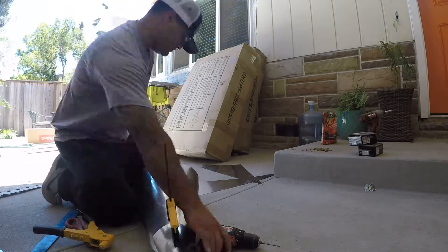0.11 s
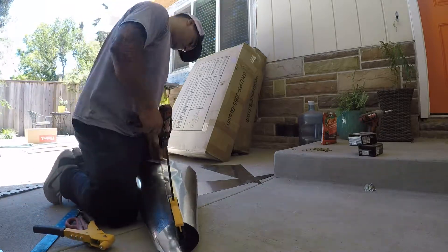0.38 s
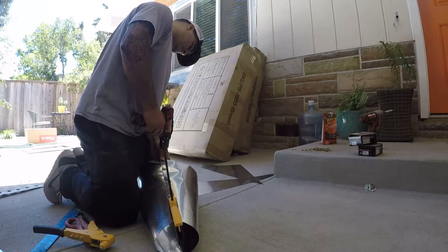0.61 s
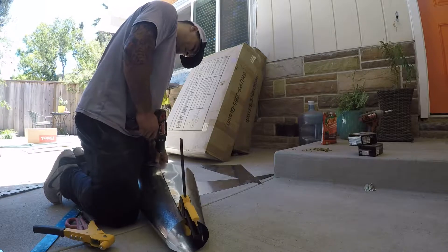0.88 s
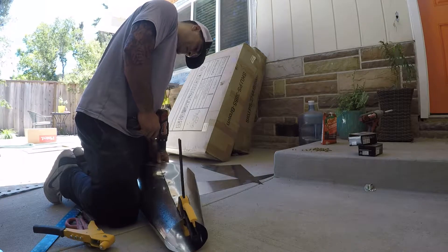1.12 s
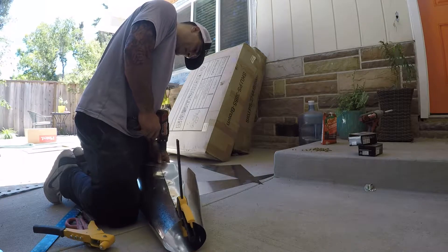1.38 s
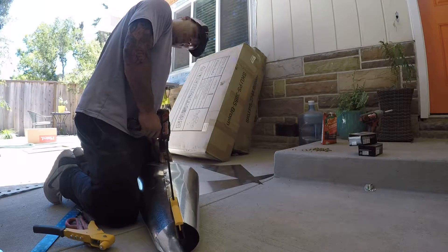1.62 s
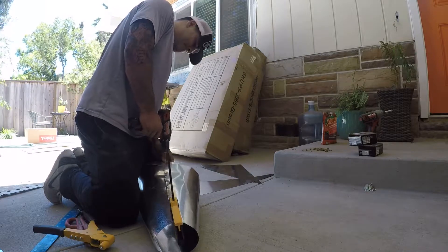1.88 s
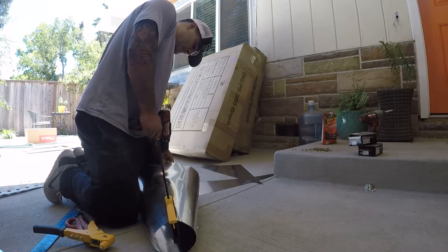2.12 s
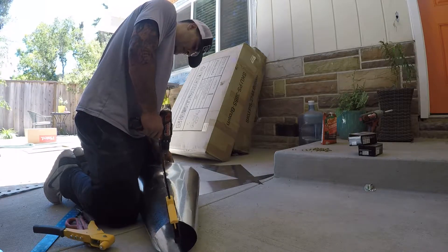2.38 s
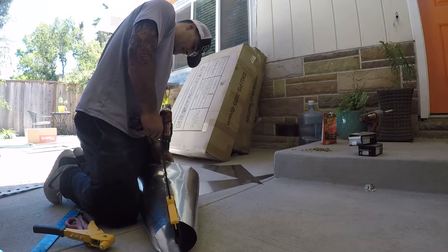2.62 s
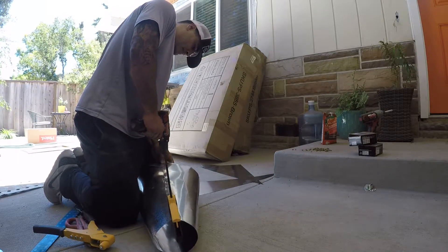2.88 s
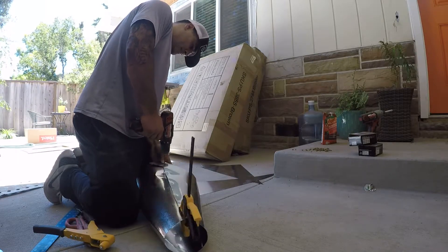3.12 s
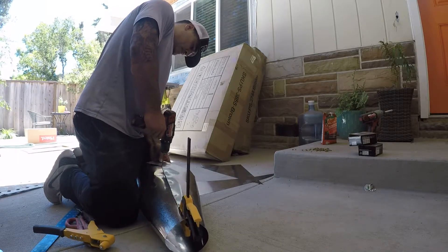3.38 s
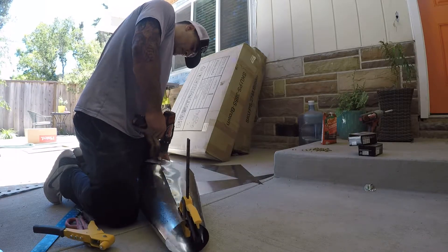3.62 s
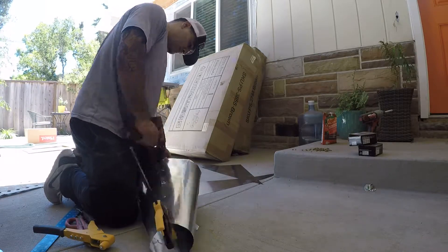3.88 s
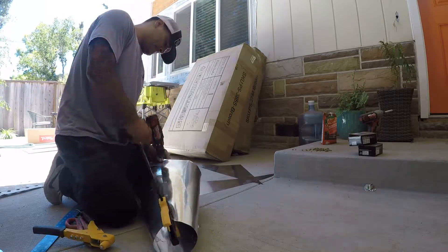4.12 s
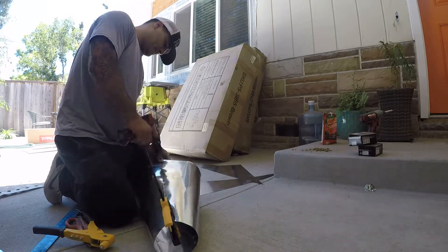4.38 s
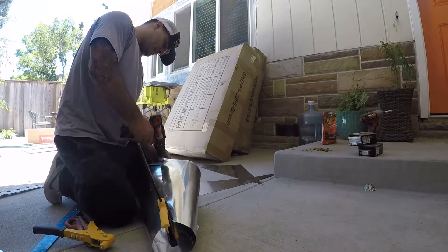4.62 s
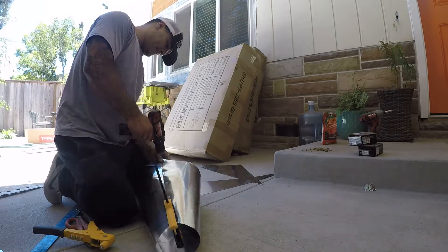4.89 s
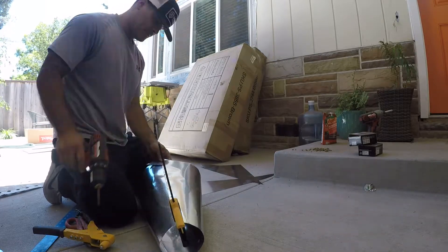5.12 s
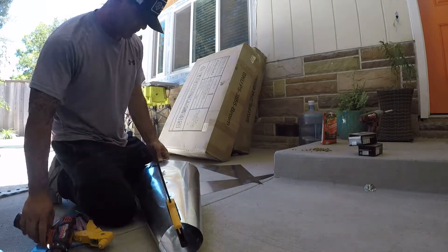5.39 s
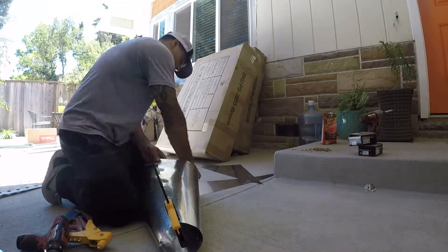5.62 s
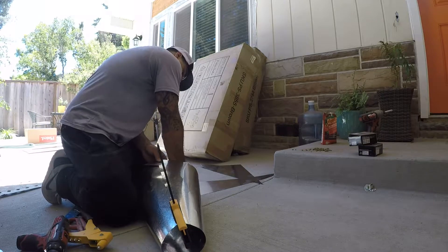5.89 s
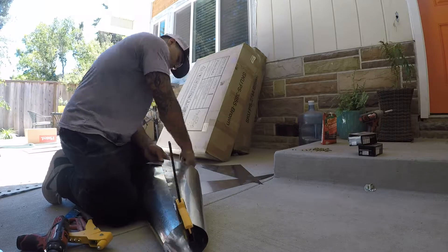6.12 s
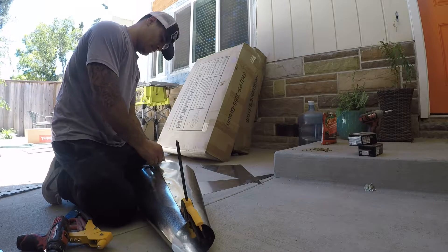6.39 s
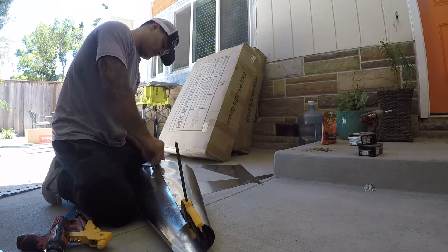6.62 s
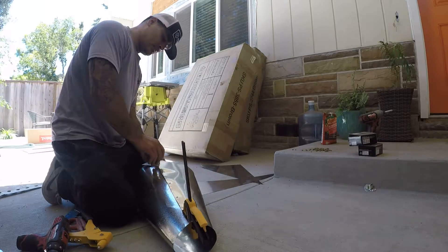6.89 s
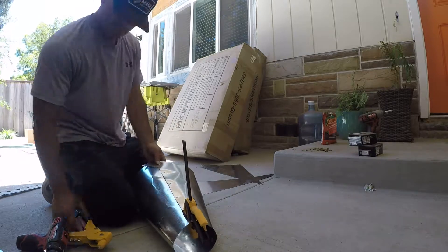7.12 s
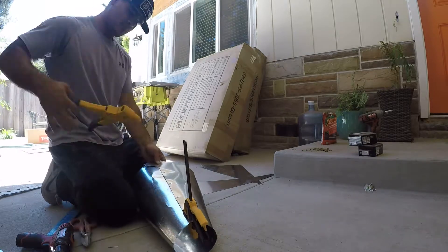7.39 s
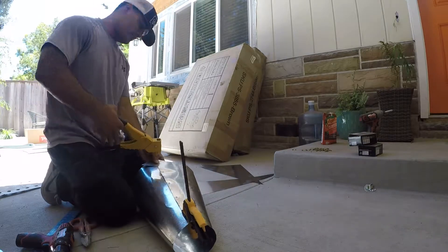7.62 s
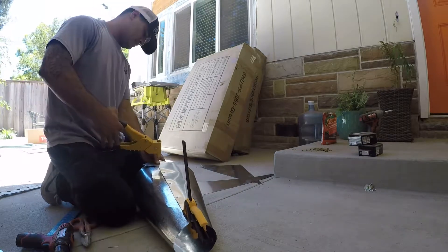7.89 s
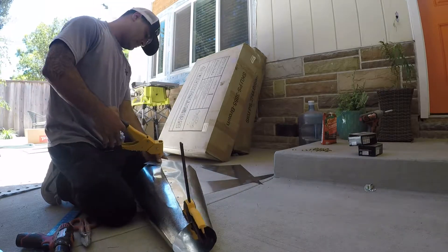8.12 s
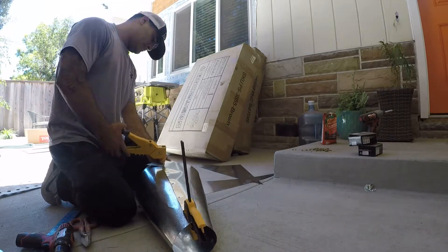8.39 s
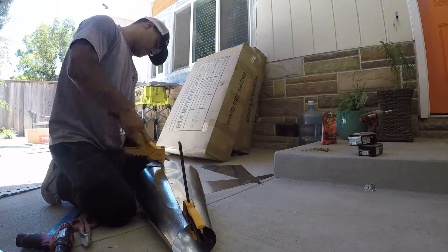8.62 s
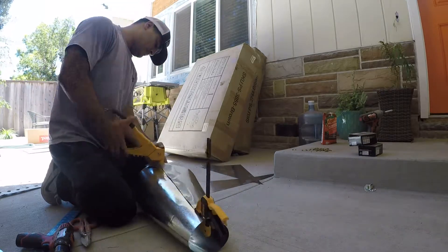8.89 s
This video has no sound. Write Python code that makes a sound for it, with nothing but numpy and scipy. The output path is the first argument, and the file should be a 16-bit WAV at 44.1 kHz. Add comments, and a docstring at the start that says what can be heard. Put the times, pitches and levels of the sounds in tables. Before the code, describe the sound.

Harsh drill whine and metallic scraping in a thin steel duct for four seconds, followed by sharp tool knocks, scrapes and a faint falling squeal.

```python
"""A cordless drill whirrs, whines and bites through a thin steel duct on a concrete patio: shaped noise for
motor, cutting edge and ringing steel, gliding sines for the gears, short noise bursts for bites.
Tools and rivets knock and scrape before and after (bursts ringing steel and duct), and a riveter squeals.
Under the outdoor roar and hiss, a wind filter opens and lets a machine's steady low drone (resonant noise)
through. Two close microphone ports hear the sounds with phase differences that vary with frequency."""
import sys
import numpy as np
from scipy import signal
from scipy.fft import rfft, irfft, next_fast_len
from scipy.io import wavfile
from scipy.ndimage import uniform_filter1d, map_coordinates

SR = 44100
rng = np.random.default_rng(int(sys.argv[2]) if len(sys.argv) > 2 else 0)


def persist_wave(psi):
    """Save psi, clipped to +-1, as 16-bit WAV."""
    counts = np.round(np.clip(psi, -1, 1) * 32767).astype(np.int16)
    wavfile.write(sys.argv[1], SR, np.atleast_2d(counts).T)


def invert_db(x):
    """Field ratio 10**(x/20) for x, a level in decibels (scalar or array-like)."""
    u = np.asarray(x, float) / 20
    return 10 ** u


N = 397076  # samples

# The drill at work. Each row: time in seconds, motor whirr in dB, load on the bit in dB.
WHIRR_AND_LOAD = [(1.28, -31.5, -3.5), (1.48, -30, -6), (1.52, -31, 0.5), (1.79, -32, -3.5),
                  (2.0, -29.5, -2), (2.3, -28, -3), (2.6, -30, 1), (2.97, -27.5, -3), (3.08, -28.5, 2.5),
                  (3.25, -28.5, -0.5), (3.31, -29.5, 3.5), (3.63, -26.5, -1), (3.69, -30, -1.5),
                  (3.99, -28, -2.5), (4.08, -28, -2), (4.23, -28.5, -2), (4.45, -28, -0.5),
                  (4.62, -28, -3.5), (4.72, -29, 0.5), (4.94, -30, -2), (5.04, -35, 0.5)]
# Colour of fan and brushes. Each row: frequency in Hz, relative level in dB.
WHIRR_COLOUR = [(2900, -19), (5000, 4.5), (6300, 6), (8000, 4), (10600, 4), (12500, 4.5), (15000, 4),
                (15750, 0), (16100, -76)]
# Resonances of the motor housing. Each row: frequency in Hz, width in Hz, relative level in dB.
HOUSING_MODES = [(6200, 550, -7.5), (9870, 550, -11), (12400, 720, -8), (14000, 540, -16)]
# Colour of the flutes scraping steel. Each row: frequency in Hz, relative level in dB.
CUTTING_COLOUR = [(820, -13.5), (1400, 0.5), (1740, -2.5), (2630, 0), (3430, 0.5), (3820, 4.5), (4500, 0),
                  (6150, -3.5), (6750, -13), (9000, 1), (11700, -9), (19800, -120)]
# Resonances of the tools' steel. Each row: frequency in Hz, width in Hz, relative level in dB.
STEEL_MODES = [(1860, 380, 4), (2050, 40, -28), (2560, 220, 8), (3124, 25, 18), (3780, 480, 12.5),
               (4450, 290, 11.5), (4734, 39, 12), (5500, 62, 12), (6150, 170, 3), (7360, 110, 11.5),
               (7660, 150, 3), (8400, 570, 12), (8610, 130, 3), (8620, 210, 7), (10120, 740, -1.5),
               (11590, 160, -14), (12800, 230, -25), (13500, 260, -14), (13600, 540, 4.5)]
# Resonances of the duct wall. Each row: frequency in Hz, width in Hz, relative level in dB.
DUCT_MODES = [(546, 82, -10.5), (650, 35.5, 3), (831, 74, -5.5), (1026.5, 47, 2.5), (1133, 49, 7.5),
              (1155.7, 45, 6.5), (1301, 24.5, 6.5), (1421, 42, 2), (1590, 91, -4), (2065, 31, -1.5),
              (2300, 220, -5.5), (2710, 35, 0), (3297, 40, -1)]
# Narrow notes the duct sings under the turning bit. Each row: frequency in Hz, width of the resonance in Hz.
SINGING_NOTES = [(1020, 20), (1172, 30), (1531, 28), (2046, 36)]
# One value for each singing note: relative level in dB.
SINGING_LEVELS_DB = [0, -4, -6, -5]
# The bit slips free and the noise drops. Each row: time in seconds, return in seconds, depth in dB.
BIT_SLIPS = [(4.005, 0.014, 3), (4.642, 0.087, 4), (4.808, 0.033, 7), (4.845, 0.069, 5.5), (4.92, .02, 8),
             (4.955, 0.019, 1.5)]
# Gear mesh at speed, sagging under load and falling with the brake. Each row: time in seconds, pitch in Hz.
MESH_PITCH = [(1.2, 1290), (1.5, 1268), (1.9, 1251), (2.04, 1263), (2.35, 1255), (2.45, 1237), (2.65, 1248),
              (2.95, 1236), (3.04, 1272), (3.14, 1283), (3.33, 1279), (3.4, 1247), (3.7, 1245),
              (3.77, 1275), (3.83, 1215), (3.9, 1250), (3.97, 1205), (4.02, 1270), (4.06, 1294),
              (4.09, 1262), (4.13, 1232), (4.17, 1244), (4.22, 1263), (4.31, 1300), (4.35, 1296),
              (4.39, 1262), (4.44, 1230), (4.49, 1266), (4.57, 1278), (4.61, 1232), (4.66, 1250),
              (4.7, 1210), (4.74, 1250), (4.8, 1285), (4.87, 1278), (4.98, 1292), (5.03, 1262),
              (5.07, 1170)]
# The leading gear tone. Each row: multiple of the mesh, relative level in dB, left port's lead in radians.
LEADING_GEAR_TONE = [(3, 4.5, 1.9)]
# Higher gear tones. Each row: multiple of the mesh, relative level in dB, left port's lead in radians.
HIGH_GEAR_TONES = [(5, -6, .8), (6, -8, 1), (7, -7, 1), (7.78, -5, .8), (8, -6, .8), (9, -2, .5),
                   (9.85, -2.5, .4), (10.14, -5, .4), (11, -7, .3), (11.56, -5, .3), (12.02, -4, .3)]
# A short rasp as the trigger is touched, then the bit's bites. Each row: time in seconds, level in dB,
# duct ring in relative dB, brightest pitch in Hz, rise in seconds.
DRILL_RASPS = [(1.163, -23, -20, 9000, 0.0054), (1.9822, -11.5, -4.5, 13500, 0.0049),
               (1.985, -10.5, -11, 1800, 0.0016), (1.987, -13.5, -18, 6500, .003),
               (2.4292, -15, -1, 9120, 0.0062), (2.5594, -17, -3, 12400, .006),
               (2.9844, -12.5, -2.5, 6170, 0.0055), (3.079, -17, -17, 3800, 0.0055),
               (3.3293, -16, -1.5, 12700, 0.0063), (3.647, -9.5, -1.5, 7800, 0.0028),
               (3.657, -11, -4, 5500, 0.0056), (4.014, -13, -16, 5000, 0.01),
               (4.029, -8.5, -20, 8500, 0.0096), (4.1993, -20.5, -1, 2700, 0.0049),
               (4.316, -15.5, -12, 2690, 0.0086), (4.322, -8, -19, 5600, 0.012),
               (4.359, -9, -29, 8400, .006), (4.366, -10, -20, 13500, 0.0055),
               (4.388, -15, -1, 3770, 0.0056), (4.446, -10, -9, 2690, 0.012),
               (4.453, -12.5, -26, 6960, 0.0058), (4.53, -15, -10, 2400, 0.017),
               (4.562, -16, -8, 5000, 0.011), (4.719, -19, 0.5, 2500, 0.0067),
               (4.755, -13, -13, 2700, 0.0095), (4.77, -8, -12, 4430, .008),
               (4.7897, -21.5, 0.5, 2700, 0.005), (4.812, -8.5, -18, 8200, 0.0099),
               (4.883, -8.5, -21, 9700, 0.0043), (4.892, -18, -7, 2670, 0.0093),
               (4.934, -13, -27, 13600, .006), (4.962, -12, -24, 13600, .004),
               (4.971, -8, -19, 14200, .005), (4.997, -19, -9, 8300, 0.008), (5.042, -35, -12, 6600, .006)]
# Chips squeal on the bit. Each row: start in seconds, length in seconds, start and end pitch in Hz, level in dB.
CHIP_SQUEALS = [(3.138, 0.06, 10000, 8400, -26), (3.183, 0.064, 8100, 7770, -26.5),
                (3.757, 0.11, 6200, 5880, -30.5), (3.853, 0.068, 5700, 5370, -27),
                (4.09, 0.036, 5900, 5560, -30), (4.615, 0.067, 6150, 6200, -26)]
# Blunt knocks, each ringing one note: the duct under the drill, later the riveter's body. Each row: time in
# seconds, level in dB, note in Hz, 60 dB decay in seconds.
THUMPS = [(2.989, -28, 620, .05), (3.418, -33, 668, .4), (3.79, -32.5, 635, 0.39),
          (3.96, -31, 647, 0.15), (4.034, -33, 652, 0.14), (4.205, -26.5, 650, 0.11),
          (4.318, -22, 2710, 0.12), (4.39, -28, 660, 0.093), (4.455, -30, 2670, .08),
          (4.46, -36, 650, 0.056), (4.543, -27, 2300, .07), (4.63, -35, 650, 0.23),
          (4.772, -27, 2740, .12), (4.893, -28, 2710, 0.11), (4.76, -34, 649, 0.19),
          (4.79, -24.5, 1264, 0.07), (4.834, -31.5, 636, 0.065), (4.89, -33.5, 611, 0.16),
          (5.005, -34, 645, 0.089), (7.232, -28.5, 670, 0.026), (7.2815, -20.5, 675, 0.036),
          (7.365, -21.5, 696, 0.056)]
# Tools and rivets knock on steel and concrete; near the drill's start, the bit grabs once at 1.14 s and the
# trigger clicks at 1.22 s. # Each row: time in seconds, level in dB, duct ring in relative dB, brightest pitch
# in Hz, 60 dB decay in seconds.
TOOL_TAPS = [(0.0684, -30, 5.5, 2920, 0.19), (0.447, -37, -16, 2190, .073), (0.781, -35, 2, 2530, 0.12),
             (1.139, -33.5, -22, 9000, 0.2), (1.218, -45, -22, 9000, .12), (1.257, -38, 4, 1150, .06),
             (5.293, -47, -25, 9000, .04), (5.358, -43, -25, 10500, 0.26), (5.46, -7.5, -18.5, 9900, 0.045),
             (5.464, -15.5, -19, 9300, 0.13), (5.764, -32, -18, 7700, 0.17),
             (5.8806, -23.5, -33, 7600, 0.11), (5.907, -31, -26, 7660, 0.26),
             (5.973, -23.5, -16, 3780, 0.076), (6.0038, -31, -20, 8600, 0.23), (6.13, -30, -21, 7540, 0.11),
             (6.514, -38, -19, 3780, .09), (6.536, -34, -17, 2700, 0.063), (6.5807, -20.5, -9, 4150, 0.067),
             (6.582, -23, -30, 14000, 0.069), (6.783, -35.5, -8, 3880, 0.25),
             (6.9196, -36.5, -23, 6040, 0.082), (7.083, -25.5, -17, 8400, 0.075),
             (7.102, -24, -21, 10800, .17), (7.148, -26, -15, 10600, .056), (7.226, -17.5, -19, 9700, 0.1),
             (7.2595, -25, -26, 4120, 0.039), (7.281, -21.5, -9, 1860, 0.055),
             (7.3565, -18, -21, 5100, 0.12), (7.3664, -11.5, -13.5, 10000, 0.14),
             (7.955, -33.5, 0, 7300, 0.11), (8.643, -32, -2, 13500, 0.11), (8.658, -19, -16, 13500, 0.098)]
# Tools slide, scrape and are squeezed, swelling before they fade. Each row: time in seconds, level in dB,
# duct ring in relative dB, brightest pitch in Hz, rise in seconds.
TOOL_SCRAPES = [(0.094, -34, -12, 4400, 0.0021), (5.408, -21, -29, 11600, 0.0082),
                (5.688, -29, -18, 7100, 0.015), (5.783, -36, -13, 7900, 0.0087),
                (5.83, -40, -13, 8200, 0.013), (5.862, -35, -20, 8200, .0091),
                (6.143, -29.5, -24, 8400, 0.008), (6.375, -38.5, 5, 6000, 0.0079),
                (7.288, -24.5, -27, 10700, 0.009), (7.325, -29.5, -2, 6000, 0.028),
                (7.372, -18, -14, 10700, 0.024), (7.89, -44, 3, 2500, 0.011), (8.1, -35, -1, 3950, 0.0094),
                (8.118, -35.5, 2, 4000, 0.0051), (8.18, -31.5, -1.5, 6250, 0.031),
                (8.212, -29, 1.5, 3770, 0.022), (8.41, -31, -2, 3720, 0.011),
                (8.636, -15.5, -1, 4400, 0.025), (8.81, -33, -9, 5900, 0.0067),
                (8.824, -26.5, -7, 5100, 0.021)]
# Squeezes of the riveter. Each row: start in seconds, length in seconds, start and settled pitch in Hz,
# level in dB before fading.
RIVETER_SQUEEZES = [(7.955, .41, 5280, 4020, -43), (8.36, .215, 4270, 4050, -46.5),
                    (8.575, .08, 4090, 4030, -51)]
# The squeal's main note, then its overtones. Each row: multiple, relative level in dB, left port's lead in radians.
JOINT_TONES = [(1, 0, 1.5), (1.5, -25, 1), (2, -20, 1), (2.5, -27, 1), (3, -21, .6), (3.45, -21, .5)]
# The far roar rises and falls. Each row: time in seconds, level in dB.
ROAR_LEVEL = [(0.0, -46.5), (0.29, -40), (1.12, -42.5), (5.08, -46.5), (5.25, -43.5), (5.73, -44),
              (6.0, -42), (6.28, -42), (6.84, -43.5), (6.98, -42.5), (7.12, -46.5), (7.3, -43.5),
              (7.55, -47.5), (7.99, -46.5), (8.1, -41.5), (8.26, -45.5), (8.34, -42), (9.0, -45)]
# Colour of the roar. Each row: frequency in Hz, relative level in dB.
ROAR_COLOUR = [(260, -44), (440, -33.5), (550, -5.5), (633, 5), (713, -4.5), (905, 0.5), (1060, -6.5),
               (1180, -6.5), (1430, -10.5), (1730, -53), (1860, -10), (2080, -26), (2600, -18), (3380, -97),
               (5720, -120)]
# Colour of the hiss. Each row: frequency in Hz, relative level in dB.
HISS_COLOUR = [(880, -40), (1500, -0.5), (1870, -4), (2250, -6.5), (2910, -2), (5710, -10), (7840, -15.5),
               (10000, -18), (16000, -22.5)]
# Clothes and hands rustle, and the hiss swells. Each row: start in seconds, length in seconds, peak level in dB.
HISS_RUSTLES = [(-.1, 1.67, -47.5), (5.782, 1.04, -46), (7.137, 0.39, -46), (7.915, 0.39, -48.5),
                (8.4, 0.88, -53)]
# Resonances of the droning machine. Each row: frequency in Hz, width in Hz, relative level in dB.
DRONE_MODES = [(147.5, 9.8, -4.5), (241.5, 29, -11), (289.8, 15.4, 3.5), (341, 7.1, -6), (387.6, 18.3, -1),
               (222, 500, -17.5)]
# The wind filter opens and lets the machine's steady low drone through; the last row stays covered by the third.
# Each row: start in seconds, level of the drone in dB, hold in seconds.
FILTER_OPENINGS = [(0.58, -31, 0.3), (3.357, -33, 0.2), (6.93, -36, 0.027), (7.1, -63.5, 0.22)]
# Phase between the ports. Each row: frequency in Hz, left port's lead in radians.
PORT_LEAD = [(100, -1), (260, -1.9), (420, -1.5), (550, -.2), (2000, -.1), (2900, -1.2), (3450, -3),
             (3700, -3.9), (4300, -3.5), (4900, -7.3), (5700, -6), (7200, -5.4), (8600, -7.2), (10000, -7),
             (11500, -6.25), (16000, -6.3)]
# How alike the ports hear. Each row: frequency in Hz, likeness from 0 to 1.
PORT_LIKENESS = [(100, .5), (250, .88), (600, .72), (1600, .85), (3000, .2), (3800, .6), (4600, .15),
                 (6200, .45), (8000, .25), (9300, .4), (10500, .2), (11500, .5), (14000, .87)]
# Balance of the ports. Each row: frequency in Hz, left over right in dB.
PORT_BALANCE = [(60, 4), (150, -3.5), (380, 1.5), (950, 3.5), (2380, 1), (5980, -0.5), (15000, -1)]

TRIGGER_S, RELEASE_S = 1.214, 5.055  # pulled, let go
SPIN_UP_S, BRAKE_DB_PER_S = 0.021, 900  # time constant of the motor's start; fall under the brake
CONTACT_S, SINKS_S = 1.48, 3.67  # the bit meets the steel; it sinks in and damps the singing notes
BINDS_S, THROUGH_S = 4.01, 4.66  # the bit binds in the hole; it is through
CUT_DB, RING_DB, RING_PER_LOAD = -3, -8.5, 1.8  # cutting and duct re whirr at load 0; ring dB per dB of load
FREE_RING_DB, SINGING_DB = -6.5, -17  # duct change once the bit is through; singing notes re whirr
SLIP_DROP_S = 0.0068
WHINE_DB, WHINE_WANDER_DB, FREE_WHINE_DB = -43.5, 0.8, -4  # base level; slow drift; change once through
WHINE_DB_PER_HZ, MIDDLE_HZ = 0.135, 1263  # louder as the gears speed up
MESH_NOTE_DB, MESH_NOTE_PER_LOAD = -2, 0.5  # the mesh's own low note re the whine; dB per dB of load
DEEP_NOTE_DB, BINDING_DB = 3.5, 2.5  # the low note gains once the bit sinks in; the leading tone while it binds
STARTING_DB, HIGH_FADE_DB_PER_S = 3, 0.5  # faint until at speed; higher tones weaken as the bit sinks in
RASP_T60_S, SCRAPE_T60_S, TAP_RISE_S = 0.096, 0.096, 0.00057
ONSET_S, SETTLE_S = 0.03, 0.135  # the squeal takes hold; time constant of its falling pitch
FADE_DB, FADE_S = 11, 0.13  # the squeal's main note loses strength as the handle slows
RUB_DB = -12  # dry rubbing noise re the squeal
HISS_DB = -50.5
SHUT_DRONE_DB, SHUT_WANDER_DB = -68.5, 2  # the machine's low notes while the filter is shut
OPEN_DB_PER_S, CLOSE_DB_PER_S, CLOSE_TAIL_S = 226, 58, 1  # opening; first fall on closing; its slowing
TOP_HZ, ABOVE_TOP_DB = 15900, -38  # the treble is cut above this


def drill():
    """Motor whirr; the cutting edge scrapes in fine grains and shakes bit and duct."""
    whirr_db, load_db = curves(WHIRR_AND_LOAD)
    slip_db = slips_db()
    whirr_colour = lambda hz: colour(WHIRR_COLOUR)(hz) * (1 + np.abs(modes(HOUSING_MODES)(hz)))
    whirr = invert_db(-2 + 0.67 * wobble(640) + 0.79 * wobble(30.03)) * noise(whirr_colour)

    chatter = invert_db(1.0 * wobble(900) + 1.4 * wobble(40))  # chips tear off unevenly
    scrape = lambda hz: colour(CUTTING_COLOUR)(hz) * (4.6 + np.abs(modes(STEEL_MODES)(hz)))
    cutting = invert_db(CUT_DB + load_db - 1.8 * slip_db) * chatter * noise(scrape)

    ring_db = RING_DB + RING_PER_LOAD * load_db + FREE_RING_DB * (time() > THROUGH_S)
    ring = invert_db(ring_db + 1.6 * wobble(25.09)) * noise(modes(DUCT_MODES))
    singing = (time() > CONTACT_S) * (time() < SINKS_S)
    for (hz, width), db in zip(SINGING_NOTES, SINGING_LEVELS_DB):
        level = invert_db(SINGING_DB + db + load_db / 2 + 1.2 * wobble(5.06))
        narrow = lambda f: modes([(hz, width, 0)])(f) ** 2
        ring = ring + singing * level * noise(narrow)
    return invert_db(whirr_db - slip_db + motor()[1]) * (whirr + cutting + ring)


def motor():
    """Share of full speed, and the loudness in dB that goes with starting and braking."""
    speed = 1 - np.exp(-np.maximum(time() - TRIGGER_S, 0) / SPIN_UP_S)
    brake_db = BRAKE_DB_PER_S * np.maximum(time() - RELEASE_S, 0)
    return speed, 28 * np.log10(speed + 1e-6) - brake_db


def slips_db():
    """How far the drill's noise drops while the bit runs free: a quick fall, a slower return."""
    return sum(np.interp(time() - s, [-SLIP_DROP_S, 0, back], [0, db, 0]) for s, back, db in BIT_SLIPS)


def gears():
    """The gearbox whines at multiples of its tooth mesh; the teeth rattle most while it gathers speed."""
    speed, motor_db = motor()
    full_hz, = curves(MESH_PITCH)
    load_db = curves(WHIRR_AND_LOAD)[1]
    rattle = (0.001 + 0.15 * (1 - speed)) * wobble(200)
    mesh_hz = speed * full_hz * (1 + rattle + 0.002 * wobble(16))
    lead_db = WHINE_DB_PER_HZ * (full_hz - MIDDLE_HZ)

    low_db = MESH_NOTE_DB + DEEP_NOTE_DB * (time() > SINKS_S) + MESH_NOTE_PER_LOAD * load_db
    low = invert_db(low_db) * tones(mesh_hz, [(1, 0, 0.3)], flutter_db=3, rate=20)
    binding = (time() > BINDS_S) * (time() < THROUGH_S)
    leading = invert_db(lead_db + BINDING_DB * binding) * tones(mesh_hz, LEADING_GEAR_TONE, flutter_db=1.3, rate=25)
    high_db = lead_db / 2 - HIGH_FADE_DB_PER_S * (time() - TRIGGER_S)
    high_hz = mesh_hz * (1 + 0.002 * wobble(150))
    high = invert_db(high_db) * tones(high_hz, HIGH_GEAR_TONES, flutter_db=2.5, rate=9)

    whine_db = WHINE_DB + FREE_WHINE_DB * (time() > THROUGH_S) + WHINE_WANDER_DB * wobble(5.5)
    starting_db = STARTING_DB * np.clip((1 - speed) / 0.08, 0, 1)
    return invert_db(whine_db + 0.5 * motor_db - starting_db - 0.6 * slips_db()) * (low + leading + high)


def rasps():
    """A short rasp as the trigger is touched; then the bit grabs the edge of the hole in short rasps."""
    return contacts([(*row, RASP_T60_S) for row in DRILL_RASPS], width=0.47, steel_db=-3.5, crest_db=15.5)


def chips():
    """A few chips squeal against the flutes: gliding sines with a rough pitch."""
    out = np.zeros((2, N))
    for s, length, start_hz, end_hz, db in CHIP_SQUEALS:
        n = round(length * SR)
        roughness_hz = 1200 * uniform_filter1d(rng.standard_normal(n), size=40)
        glide_hz = np.linspace(start_hz, end_hz, n) + roughness_hz
        squeal = np.hanning(n) * np.sin(2 * np.pi * np.cumsum(glide_hz) / SR)
        out[0, round(s * SR):][:n] += invert_db(db) * squeal
    return out


def thumps():
    """A blunt blow rings on one note, with a short hard edge."""
    out = np.zeros((2, N + SR))
    t = np.arange(SR // 4) / SR
    for s, db, hz, t60 in THUMPS:
        note = invert_db(-60 * t / t60) * np.sin(2 * np.pi * hz * t)
        edge = 0.63 * invert_db(-60 * t / 0.014) * np.sin(2 * np.pi * 2.72 * hz * t)
        out[0, round(s * SR):][:len(t)] += invert_db(db) * (note + edge)
    return out[:, :N]


def taps():
    """Hard things knock and scrape, ringing a little like steel."""
    knocks = [(*row, TAP_RISE_S, t60) for *row, t60 in TOOL_TAPS]
    scrapes = [(*row, SCRAPE_T60_S) for row in TOOL_SCRAPES]
    return contacts(knocks + scrapes, width=0.94, steel_db=-4, crest_db=9.5)


def contacts(table, width, steel_db, crest_db):
    """A table of contacts, each a burst at its moment; crest_db makes room for the noise's peaks."""
    out = np.zeros((2, N + SR))
    for s, db, ring_db, bright_hz, rise, t60 in table:
        hit = burst(ring_db, bright_hz, rise, t60, width, steel_db)
        out[:, round(s * SR):][:, :hit.shape[1]] += invert_db(db - crest_db) * hit
    return out[:, :N]


def burst(ring_db, bright_hz, rise, t60, width, steel_db):
    """One contact: noise round its brightest pitch rises and dies; steel and duct ring with it."""
    t = np.arange(SR // 4) / SR
    shape = np.minimum(t / rise, 1) ** 2 * invert_db(-60 * np.maximum(t - rise, 0) / t60)
    crack = shape * noise(modes([(bright_hz, width * bright_hz, 0), (8000, 14000, -9)]), len(t))
    steel = filtered(crack, modes(struck(STEEL_MODES, 2.5)))
    push = shape ** 2 * rng.standard_normal((2, len(t)))  # briefer than the rattle
    ring = filtered(push, modes(struck(DUCT_MODES, 1.8)))
    return crack + invert_db(steel_db) * steel + invert_db(ring_db + 12.0) * ring / np.abs(ring).max()


def struck(table, scatter_db):
    """Each blow lands elsewhere and wakes the modes at new strengths."""
    scatter = scatter_db * rng.standard_normal(len(table))
    return [(hz, width, db + change) for (hz, width, db), change in zip(table, scatter)]


def riveter():
    """Stick-slip in the joint: a thin, broken, falling whistle with uneven overtones."""
    out = 0
    for s, length, start_hz, settled_hz, db in RIVETER_SQUEEZES:
        t = np.maximum(time() - s, 0)
        pitch_hz = settled_hz + (start_hz - settled_hz) * np.exp(-t / SETTLE_S)
        pitch_hz = pitch_hz * (1 + 0.007 * wobble(150))
        gate = np.clip(np.minimum(t / ONSET_S, (length - t) / 0.01), 0, 1)
        level = gate * invert_db(db + 2 * wobble(30))
        faded = 1 - np.exp(-(t / FADE_S) ** 3)
        main = invert_db(-FADE_DB * faded) * tones(pitch_hz, JOINT_TONES[:1], flutter_db=2.5, rate=60)
        # the overtones flutter but do not fade with the main note
        overtones = invert_db(-FADE_DB / 3) * tones(pitch_hz, JOINT_TONES[1:], flutter_db=3.5, rate=20)
        rub = invert_db(RUB_DB - FADE_DB / 2 * faded + 3.3 * wobble(60)) * noise(modes([(10000, 9000, 0)]))
        out = out + level * (main + overtones + rub)
    return out


def outdoors():
    """Coloured noises: a far roar, hiss with rustling, and the machine's resonant drone."""
    roar = invert_db(curves(ROAR_LEVEL)[0] + 1.2 * wobble(12)) * noise(colour(ROAR_COLOUR))
    rustle_power = 0
    for s, length, db in HISS_RUSTLES:
        rustle_power = rustle_power + invert_db(2 * db) * np.sin(np.pi * np.clip((time() - s) / length, 0, 1))
    hiss_level = np.sqrt(invert_db(2 * HISS_DB) + np.abs(rustle_power))
    hiss = hiss_level * invert_db(1.7 * wobble(9.1)) * noise(colour(HISS_COLOUR))
    low_notes = lambda hz: modes(DRONE_MODES)(hz) / (1 + (hz / 460) ** 12)
    return roar + hiss + invert_db(drone_db()) * noise(low_notes)


def drone_db():
    """The drone's level through the wind filter, which opens fast, holds, then closes ever more slowly."""
    level = SHUT_DRONE_DB + SHUT_WANDER_DB * wobble(6.0)
    for s, db, hold in FILTER_OPENINGS:
        opening_s = (db - SHUT_DRONE_DB) / OPEN_DB_PER_S
        after = np.maximum(time() - s - opening_s - hold, 0)
        fall = CLOSE_DB_PER_S * CLOSE_TAIL_S * (1 - np.exp(-after / CLOSE_TAIL_S))
        climb = SHUT_DRONE_DB + OPEN_DB_PER_S * (time() - s)
        level = np.maximum(level, np.minimum(climb, db - fall))
    return level


def time():
    """Seconds, one value per sample."""
    return np.arange(N) / SR


def curves(rows):
    """One value per sample for each column after the time."""
    s, *cols = np.transpose(rows)
    return [np.interp(time(), s, c) for c in cols]


def wobble(rate):
    """A smooth random curve, rate knots a second."""
    knots = rng.standard_normal(int(N * rate / SR) + 4)
    return map_coordinates(knots, [np.arange(N) * rate / SR])


def tones(pitch_hz, partials, flutter_db, rate):
    """Partials of a moving pitch, each fluttering in level on its own and reaching the ports out of step."""
    turn = 2 * np.pi * np.cumsum(pitch_hz) / SR
    out = 0
    for k, db, lead in partials:
        apart = np.array([wobble(rate), wobble(rate)]) / 2  # each port flutters a little on its own
        flutter = invert_db(flutter_db * (wobble(rate) + apart))
        out = out + invert_db(db) * flutter * np.sqrt(2) * np.sin(k * turn + [[lead / 2], [-lead / 2]])
    return out


def noise(response, n=N):
    """Two unrelated noises of one colour, rms 1: for ports(), the direct sound and the scattered sound."""
    return unit(filtered(rng.standard_normal((2, n)), response))


def unit(x):
    """Scaled to rms 1."""
    return x / np.sqrt(np.mean(x ** 2) + 1e-20)


def filtered(x, response):
    """x times a complex response of frequency."""
    n = x.shape[-1]
    m = next_fast_len(n + 4096)
    return irfft(rfft(x, m) * response(np.fft.rfftfreq(m, 1 / SR)), m)[..., :n]


def modes(table):
    """The causal response of a set of resonances, alternating in sign."""
    def response(f):
        total = 0
        for k, (centre, width, db) in enumerate(table):
            damping = 1j * f * width
            total = total + (-1) ** k * invert_db(db) * damping / (centre * centre - f * f + damping)
        return total
    return response


def colour(spectrum):
    """The gain of a spectrum table."""
    return lambda hz: invert_db(along(spectrum, hz))


def along(points, hz):
    """Points of frequency and value, read on a log frequency axis."""
    f, v = np.transpose(points)
    return np.interp(np.log(hz + 1), np.log(f + 1), v)


def ports(pair):
    """Both ports share the direct sound, out of phase by frequency; scattered sound reaches them in opposition."""
    share = lambda hz: np.arccos(np.clip(along(PORT_LIKENESS, hz), 0, 1)) / 2
    side = np.array([[0.5], [-0.5]])
    place = lambda hz: invert_db(side * along(PORT_BALANCE, hz)) * np.exp(1j * side * along(PORT_LEAD, hz))
    direct = filtered(pair[0], lambda hz: np.cos(share(hz)) * place(hz))
    scattered = filtered(pair[1], lambda hz: np.sin(share(hz)) * place(hz) * 2 * side)
    return direct + scattered


def scene():
    """All sources; the wind filter's edge keeps the near sounds thin in the bass."""
    wind_filter = lambda hz: invert_db(-18.5) + 1 / (1 + (520 / (hz + 1)) ** 14)
    near = filtered(drill() + rasps() + chips() + taps() + thumps(), wind_filter)
    return ports(near + outdoors()) + gears() + riveter()


def band_limit(x):
    """A steep low-pass at the top of the band."""
    return signal.sosfilt(signal.butter(12, 16950, fs=SR, output="sos"), x)


def record(dry):
    """The finished mix with its highest treble cut."""
    heard = filtered(dry, lambda hz: np.where(hz < TOP_HZ, 1, invert_db(ABOVE_TOP_DB)))
    return band_limit(heard)


dry = scene()
out = record(dry)
persist_wave(out)
```